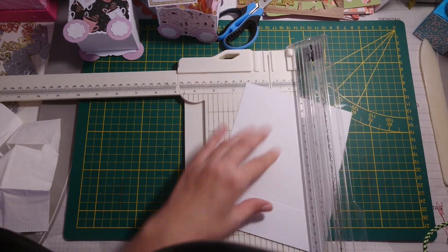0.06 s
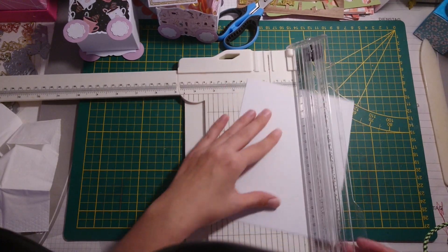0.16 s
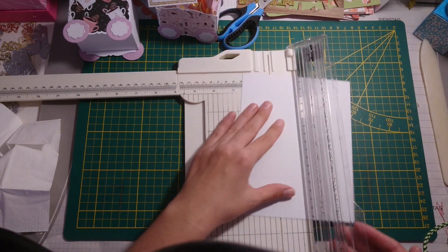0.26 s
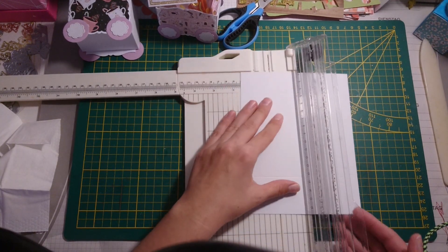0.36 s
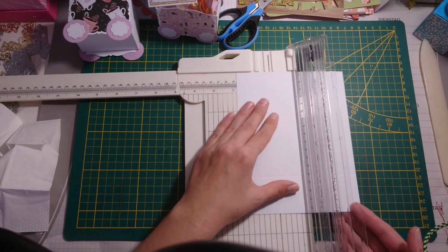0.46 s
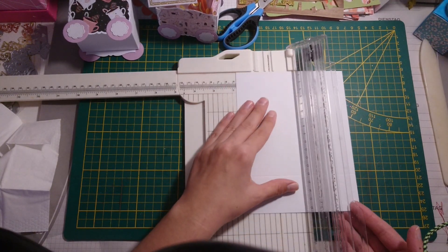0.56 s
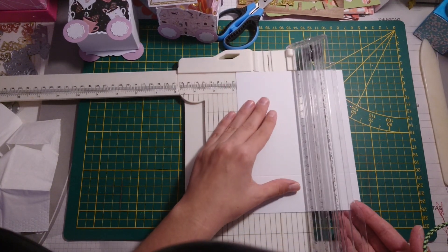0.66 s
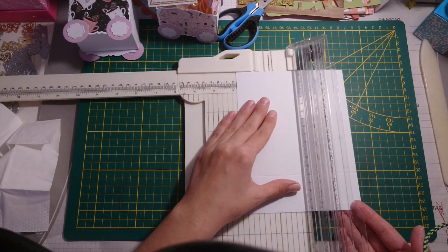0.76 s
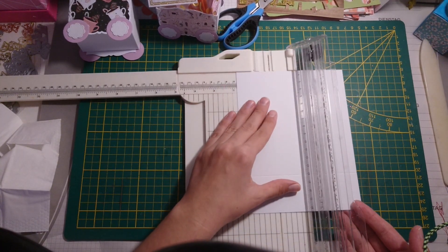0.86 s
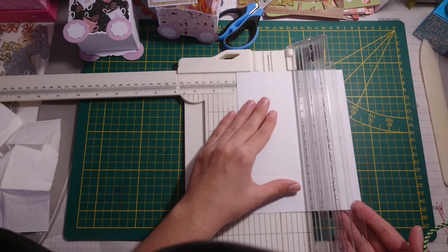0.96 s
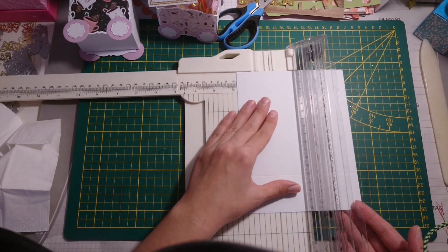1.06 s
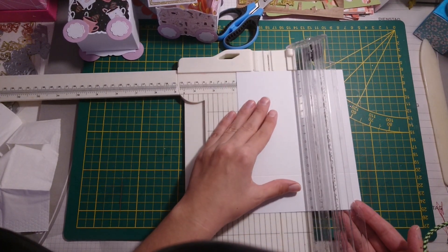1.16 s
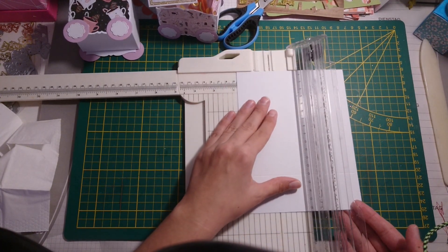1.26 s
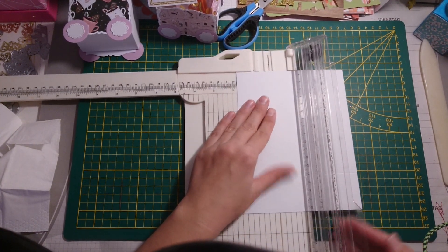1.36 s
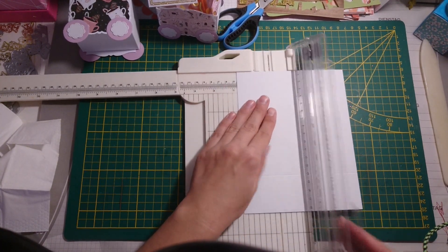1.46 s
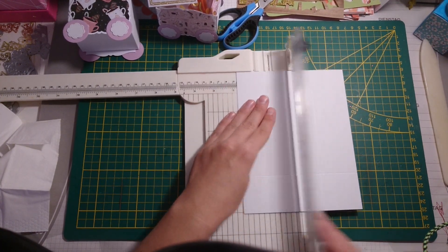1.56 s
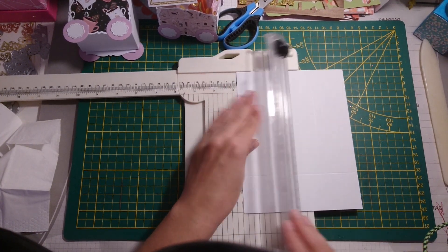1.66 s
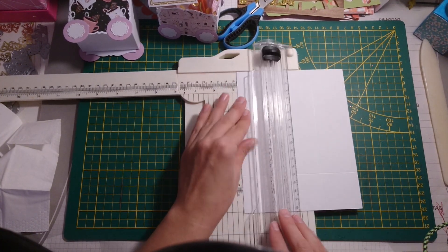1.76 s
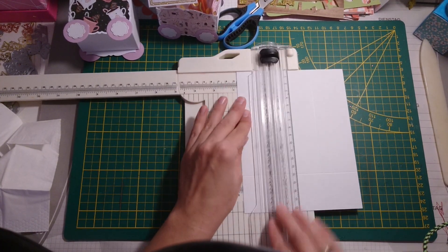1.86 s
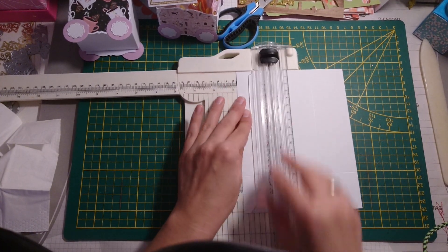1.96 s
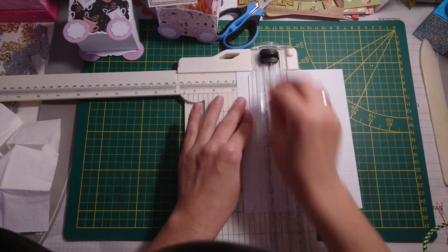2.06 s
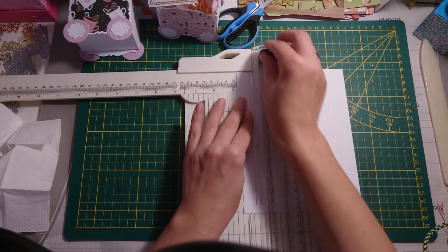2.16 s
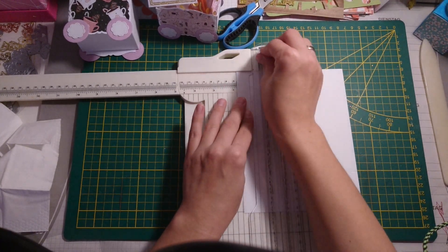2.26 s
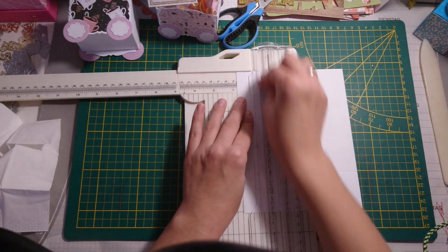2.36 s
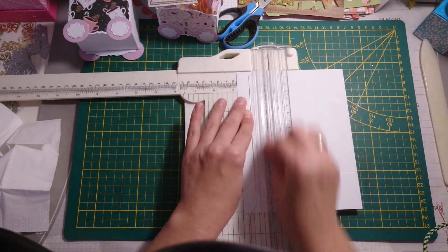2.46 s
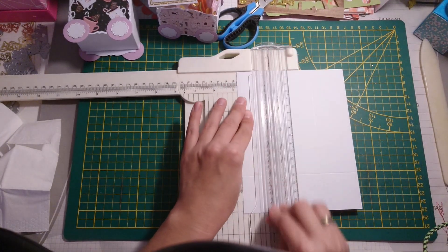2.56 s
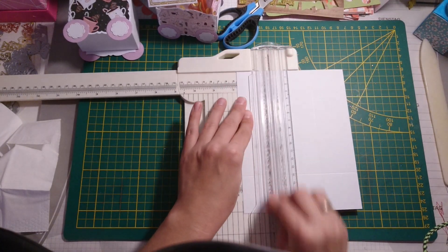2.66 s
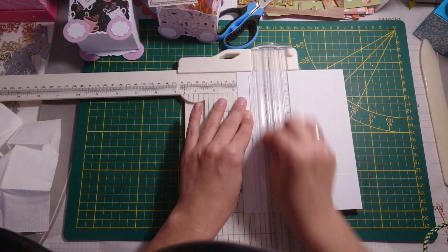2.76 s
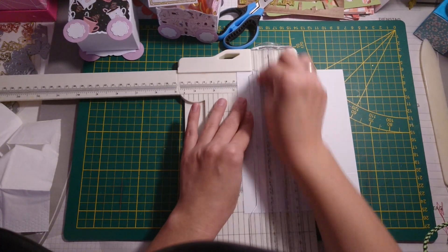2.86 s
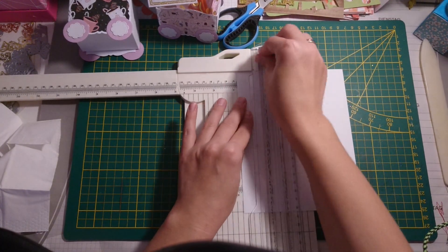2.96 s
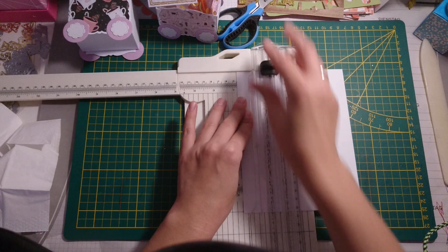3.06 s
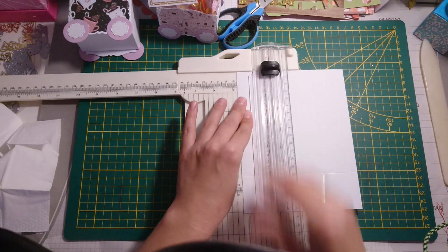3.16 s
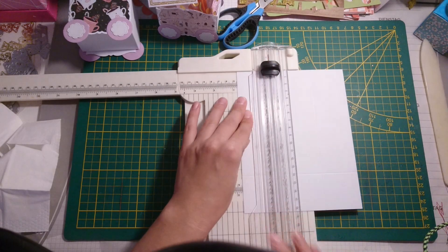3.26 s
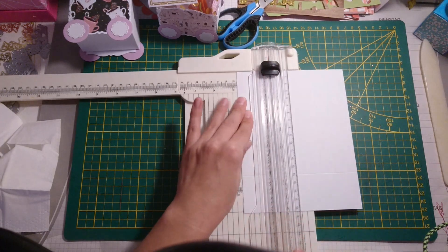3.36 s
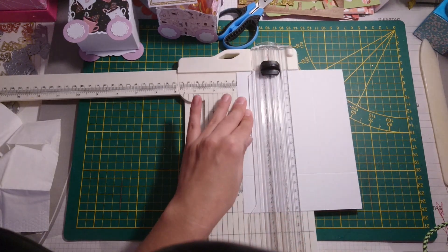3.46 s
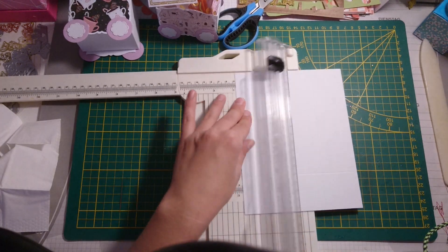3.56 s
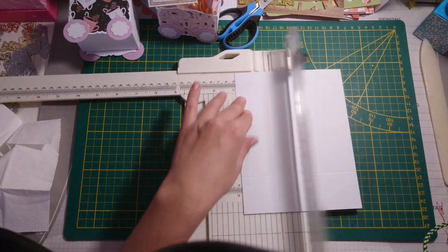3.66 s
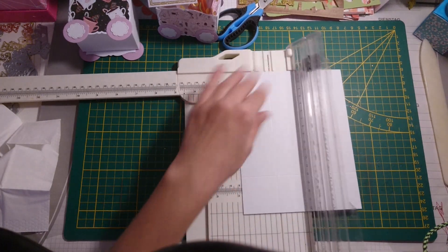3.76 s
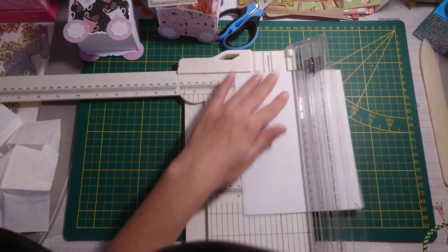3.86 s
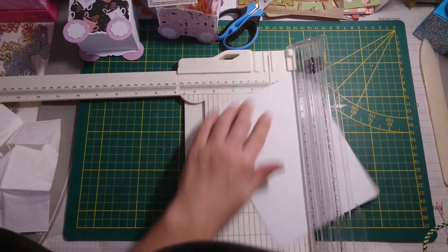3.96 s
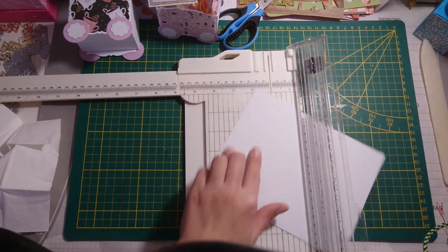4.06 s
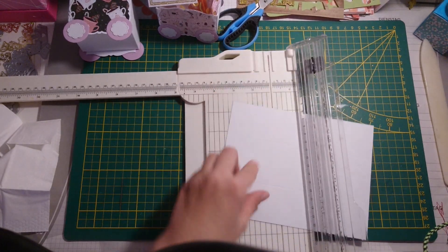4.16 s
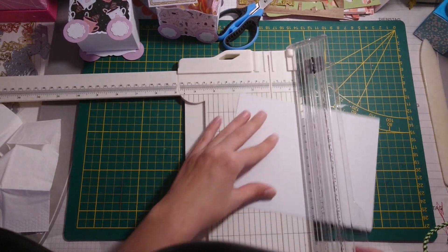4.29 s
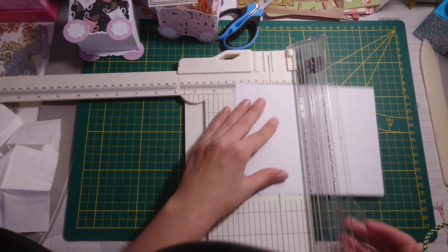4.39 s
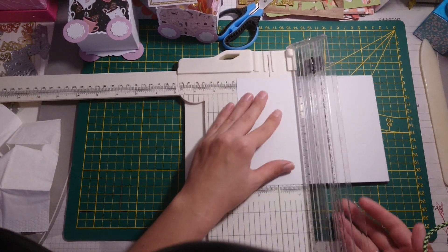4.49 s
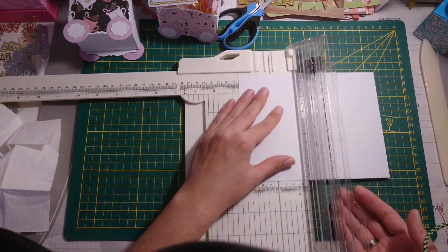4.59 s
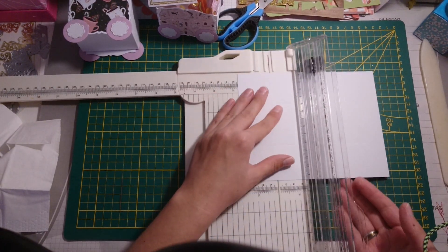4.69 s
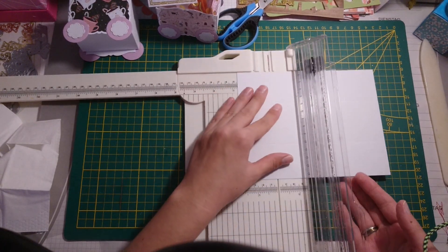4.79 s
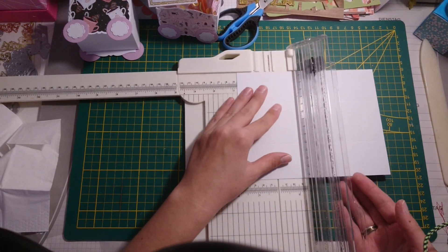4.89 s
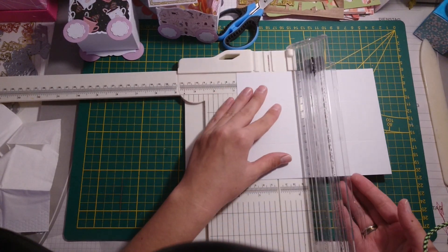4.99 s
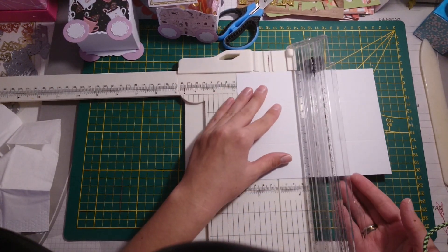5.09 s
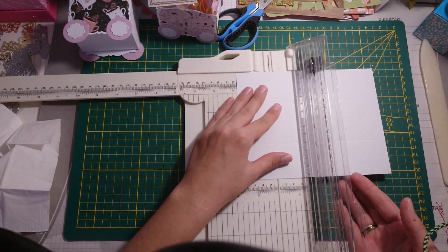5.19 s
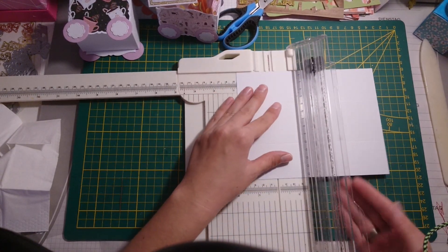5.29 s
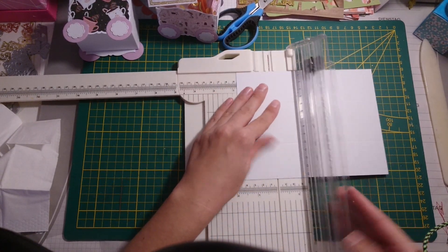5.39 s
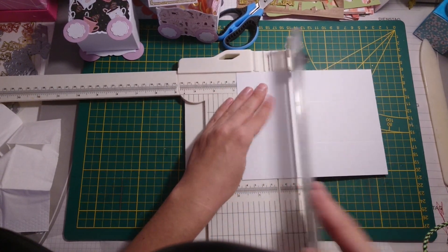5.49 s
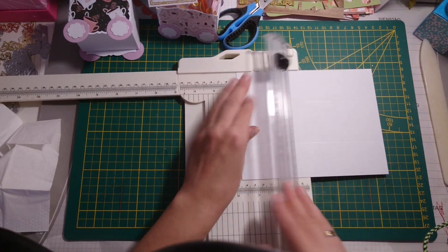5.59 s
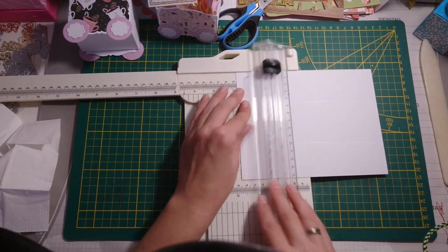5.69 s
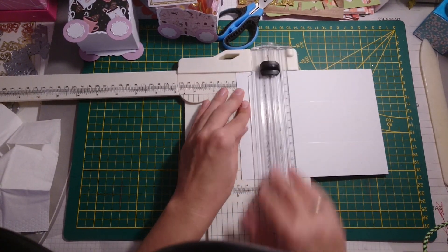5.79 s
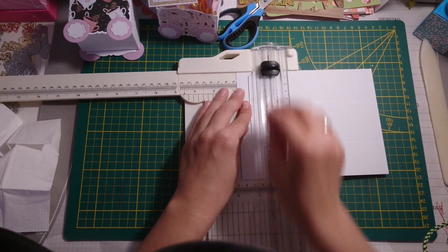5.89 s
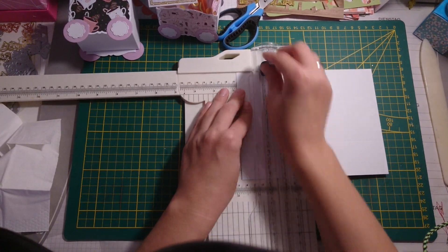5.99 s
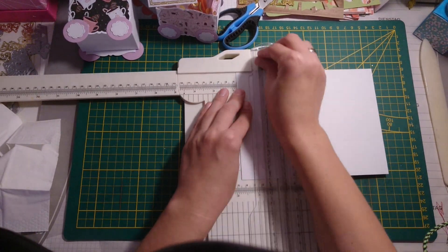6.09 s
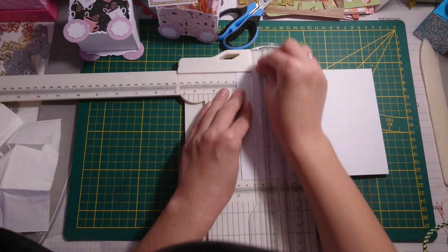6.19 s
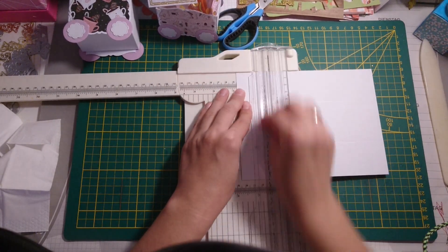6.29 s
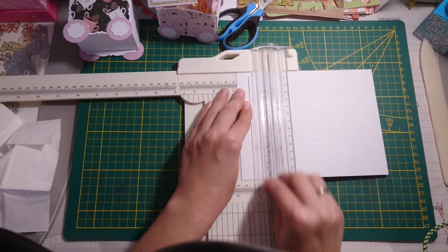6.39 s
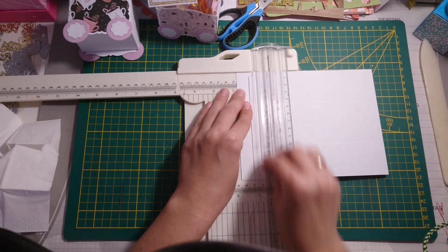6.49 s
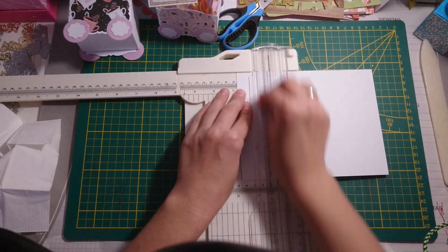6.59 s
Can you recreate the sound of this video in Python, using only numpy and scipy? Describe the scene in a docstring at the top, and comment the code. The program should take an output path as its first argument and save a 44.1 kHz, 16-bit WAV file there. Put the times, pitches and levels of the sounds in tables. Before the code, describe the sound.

Close above a desk in a small room, a paper trimmer is worked twice. Each time, a sheet of card slides softly over the base, the plastic arm squeaks briefly and snaps down, and the blade makes a short scraping pass out and back. Light clicks and a longer swish of card separate the two rounds. The knocks thud softly in the desktop, and a faint hum lies underneath.

```python
"""A small room, stereo microphone just above a desk, close on a plastic paper trimmer and cardstock.
The sheet brushes into place, the guide arm squeaks down and snaps shut, and the blade carriage scrapes
along the rail and back. The arm is lifted, the sheet turned, and it all happens again.
Each plastic knock rings the rail and booms softly in the desk, over the camera's own faint hum."""
import sys
import numpy as np
from scipy import signal
from scipy.fft import rfft, irfft
from scipy.io import wavfile
from scipy.ndimage import uniform_filter1d

SR = 44100
rng = np.random.default_rng(int(sys.argv[2]) if len(sys.argv) > 2 else 0)


def pcm_store(signal):
    """Save signal as 16-bit PCM."""
    levels = np.round(np.clip(np.atleast_2d(signal), -1, 1) * 32767)
    wavfile.write(sys.argv[1], SR, levels.astype(np.int16).T)


N = 292824
TIME = np.arange(N) / SR

# the camera's own noise at each microphone: f/Hz, level/dB
LEFT_HUM_SPECTRUM = [(20, -24), (48, 5.5), (85, -9.5), (130, -10.5), (230, -21.5), (350, -10.5), (550, -22),
                     (1100, -27), (1700, -12), (2100, -31), (3800, -34), (5000, -35.5), (7200, -28.5),
                     (14000, -32.5)]
RIGHT_HUM_SPECTRUM = [(20, -38.5), (50, -14.5), (200, -30.5), (430, -23.5), (620, -10.5), (700, -8.5),
                      (780, -1), (900, -9), (1300, -18.5), (2000, -25), (3000, -32), (3600, -25),
                      (5000, -46.5), (14000, -50)]
# colour of the reflections, and of the direct sound at the shaded right microphone: f/Hz, level/dB
ROOM_SPECTRUM = [(60, -3.5), (250, 0.5), (700, -2), (1500, -2), (4000, -3.5), (7000, -5.5), (9000, -6),
                 (13000, -3.5)]
SHADE_SPECTRUM = [(100, -4), (500, -2), (1000, 1.5), (1700, -1), (2400, -6.5), (3100, -13.5), (4100, -4),
                  (5200, -11), (7000, -12), (9000, -18), (11000, -12), (13000, -12)]
# colour of each part when rubbed or shaken: f/Hz, level/dB
HINGE_SPECTRUM = [(60, -9), (140, -4), (260, -15.5), (450, -4.5), (700, -5), (1200, -9.5), (1850, -3),
                  (2300, -8.5), (6000, -31.5)]
CARD_SPECTRUM = [(30, -14.5), (70, -14.5), (130, -9), (210, -23), (450, -9), (650, -11.5), (1000, -18.5),
                 (1700, -2), (2600, 0), (3700, 2), (5200, -6), (6800, -2), (9500, -7.5), (14000, -31.5)]
BLADE_SPECTRUM = [(300, -23), (900, -10), (1700, -5.5), (2300, -5.5), (3200, -2), (3750, -0.5), (4500, -2),
                  (5200, -10), (7000, -2.5), (7900, -13.5), (8900, -5), (10500, -20), (14000, -29)]
BOARD_SPECTRUM = [(60, -24.5), (150, -2.5), (240, -4), (330, 4.5), (400, -1.5), (460, 11.5), (520, -3),
                  (620, 5.5), (800, -6.5), (1100, -23.5), (3000, -51)]
DESK_SPECTRUM = [(25, -17), (50, -22), (68, -0.5), (90, -9), (127, 3.5), (170, -11), (400, -39.5)]
# a knock's bright crack and its thud in the base: f/Hz, level/dB
CRACK_SPECTRUM = [(150, -44), (500, 0), (1000, -10.5), (1700, -1), (2100, -2), (3000, 4), (4500, 6),
                  (5200, -2.5), (7000, 1.5), (8000, -5), (9200, -3.5), (11000, -25), (14000, -26)]
THUD_SPECTRUM = [(30, -28), (70, -5), (130, -5), (190, -31.5), (350, 7.5), (460, 12), (650, 12), (900, 0.5),
                 (1600, -32), (5000, -68)]
# modes of the desk top and the guide rail: f/Hz, level/dB, t60/s
DESK_TOP_MODES = [(66, -1, 0.26), (128.8, 2.5, 0.15), (153, -7, .1)]
RAIL_MODES = [(817, -6.5, 0.12), (1840, -15, 0.05), (1900, -15.5, .035), (2470, -35, .025),
              (2730, -21.5, 0.024), (3340, -14, 0.029), (3780, -20.5, 0.018), (3640, 1, 0.042),
              (3745, 5.5, 0.016), (3720, 4.5, 0.027), (3900, 10, 0.011), (4420, -5, 0.053),
              (4560, 0.5, 0.045), (5800, -8, 0.023), (6140, -5, 0.022), (6850, -3.5, 0.045),
              (9100, 0, 0.027)]
# the arm rubbing in its hinge: t/s, hold/s, level/dB
ARM_SWINGS = [(3.544, 0.059, -60.5), (3.699, 0.072, -56), (5.432, 0.12, -58.5), (5.63, 0.18, -64.5)]
# hinge and card edge sticking and slipping:
# t/s, length/s, f/Hz, glide/(Hz/s), level/dB, octave/dB, waver/share of pitch
STICK_SLIPS = [(1.566, 0.063, 1192, 1299.5, -44.5, -4, 0.013),
               (3.956, 0.076, 2660, -3000, -48.5, -8, 0.033), (5.518, .09, 1700, 1796, -57, -22.5, 0.043)]
# pushes of the sheet: t/s, attack/s, hold/s, release/s, level/dB, treble lift/dB
SHEET_SLIDES = [(0, 0.0044, 0.006, 0.048, -49.5, -5), (0.151, .03, 0.092, 0.13, -51.5, -2.5),
                (1.288, .19, 0.15, 0.07, -60, 5.5), (3.895, 0.076, 0.19, 0.036, -47, 6),
                (4.297, 0.027, 0.1, 0.11, -51.5, 2), (4.749, 0.018, .1, .06, -75.5, -0.5),
                (5.311, 0.2, .06, 0.15, -57, 4)]
# carriage strokes: t/s, attack/s, hold/s, final rumble/dB, shudder/dB, direction (1 to the hand, -1 back)
CARRIAGE_STROKES = [(2.28, .18, .18, -48.5, -60, 1), (2.695, .03, .16, -51.5, -44, -1),
                    (6.203, 0.14, .13, -44, -63.5, 1), (6.504, 0.047, .12, -52.5, -48.5, -1)]
# plastic contacts of arm and carriage: t/s, level/dB, rise/ms, first rebound/dB, ring over crack/dB
PLASTIC_KNOCKS = [(0.178, -49, 3.8, -2.5, -4), (1.484, -53, 6, -11, -10), (1.726, -46, 7.9, -14, 13),
                  (1.748, -43, 3.2, -0.5, 6), (1.8132, -35.5, 1.5, -6.5, 6), (1.8271, -26, 2.8, -5.5, 1),
                  (1.91, -23, 4.1, -19, 7), (1.915, -16, 3.05, -3.5, -7.5), (1.957, -22.5, 0.59, -9, 1),
                  (2.3823, -47.5, 1.3, -8, -3), (2.629, -54, 3.5, -5, 2), (2.862, -26, 4.2, -19, -0.5),
                  (2.9545, -10.5, .75, -38, 5), (3.351, -27.5, 2.27, -2, -3), (3.392, -36, 3.2, -7, -10),
                  (3.424, -40, 4.1, -12, -6), (3.553, -38.5, 1.16, 4, 28), (3.588, -39.5, 7.8, -9, -2),
                  (3.676, -42.5, 5.7, -5.5, 2), (3.717, -39.5, 6.9, -8.5, -14), (3.746, -42.5, 9.3, -8, 3),
                  (3.918, -46, 2, 9, 9), (4.26, -41.5, 7.6, -14, -19), (5.635, -41, 3.66, 0, -9),
                  (5.7637, -29.5, 3.6, 0, 10), (5.78, -5.5, 1.8, -4, -11), (5.8057, -9.5, 0.81, -9, -25),
                  (6.095, -49.5, 8.5, -4.5, 3), (6.448, -23.5, 0.74, -3, 9), (6.5394, -35, 0.96, -3.5, 14)]

ROOM_T60_S, ROOM_DB = 0.44, -4.5
REBOUND_MS, REBOUND_SPREAD = 2.8, 1.5  # gap between rebounds: this much plus a multiple of the rise
TAP_DB, THUD_DB, BOOM_DB = -40, -11.5, -64  # a light tap, its relative thud, its peak boom in the desk
THUD_FALL, BOOM_GROWTH = 0.26, 0.46  # dB per dB of force: hard blows are mostly crack
BOOM_TOP_DB = -42.5  # the mat cushions the hardest blows
BOOM_RISE_MS, LEAN_RISE_MS, LEAN_DB = 2.3, 12, -7  # the leaning hand's boom is relative to its slide
SQUEAK_BEND = .025  # share by which the pitch rises under full pressure
SCRAPE_DB, STOP_S = -49, .022  # the blade's level; how fast the carriage comes to rest
RUMBLE_GROWTH_DB_PER_S = 34.5  # the rumble grows louder as each stroke goes on
RUMBLE_FALL_OCTAVES_PER_S = 2  # the board's note drops toward the hand and climbs on the way back
SHUDDER_FADE_S = 0.13  # the desk is jolted as the carriage sets off, then settles
LOW_CUT_HZ, LEFT_TOP_HZ, TOP_HZ = 46.4, 10600, 13300


def undb(db):
    """Decibels to gain."""
    return 10 ** (np.asarray(db) / 20)


def unit(x):
    """Scale to rms 1."""
    return x / np.sqrt(np.mean(x ** 2))


def add(out, s, sound):
    """Mix a sound in at time s."""
    start = max(int(s * SR), 0)
    out[..., start:start + sound.shape[-1]] += sound[..., :N - start]


def response(points, size=4096):
    """Causal impulse response with the given spectrum."""
    hz, db = np.transpose(points)
    bins = np.maximum(np.fft.rfftfreq(size, 1 / SR), 1)
    gain = undb(np.interp(np.log(bins), np.log(hz), db))
    cepstrum = irfft(np.log(gain))
    cepstrum[1:size // 2] *= 2  # fold to minimum phase
    cepstrum[size // 2 + 1:] = 0
    return irfft(np.exp(rfft(cepstrum)))


def through(x, ir):
    """Pass a sound through an impulse response."""
    return signal.fftconvolve(x, ir)[:len(x)]


def walk(rate_hz):
    """Smooth random drift with rms 1."""
    step = max(int(SR / rate_hz), 1)
    stairs = np.repeat(rng.standard_normal(N // step + 1), step)
    return unit(uniform_filter1d(stairs, step)[:N])


def gesture(s, attack_s, hold_s, release_s):
    """A hand movement eases into its speed, keeps it and comes to rest."""
    age = TIME - s
    onset = np.sin(np.pi / 2 * np.clip(age / attack_s, 0, 1)) ** 2
    return onset * np.exp(-np.maximum(age - attack_s - hold_s, 0) / release_s)


def friction(spectrum, slips_per_s, spread_db, flutter_hz, flutter_db):
    """Tiny slips of uneven size ring a body; the grip comes and goes."""
    slips = (rng.random(N) < slips_per_s / SR) * rng.standard_normal(N)
    slips *= undb(spread_db * np.minimum(rng.exponential(size=N), 4))
    grip = undb(flutter_db * walk(flutter_hz))
    return unit(through(slips * grip, response(spectrum)))


def contact(t, rise_ms, rebound_db=0, count=1):
    """A chattering force of peak 1, and its rms; each push swells and dies, and rebounds never grow."""
    bounce = np.arange(count)[:, None]
    gap_ms = REBOUND_MS + REBOUND_SPREAD * rise_ms
    age = np.maximum(1000 * t - bounce * gap_ms, 0) / rise_ms
    strength = undb(min(rebound_db, 0) * bounce ** 2)
    push = np.max(strength * age * np.exp(1 - age), axis=0)
    return push * rng.choice([-1, 1], len(t)), np.sqrt(np.mean(push ** 2))


def ring(modes, t, scatter_db=0, detune=0):
    """Decaying modes; each contact point and grip weights and tunes them a little differently."""
    hz, db, t60 = np.transpose(modes)[:, :, None]
    tuning, weight = rng.standard_normal((2,) + hz.shape)
    waves = np.sin(2 * np.pi * hz * (1 + detune * tuning) * t) * np.exp(-np.log(1000) * t / t60)
    return np.sum(undb(db + scatter_db * weight) * waves, axis=0)


def hum(spectrum, db):
    """The camera's faint, steady noise at each microphone wavers a little."""
    noise = unit(through(rng.standard_normal(N), response(spectrum)))
    return noise * undb(db + .5 * walk(rate_hz=6))


def room(x, size=24000):
    """Dense reflections reach the microphone after a few milliseconds and die quickly."""
    t = np.arange(size) / SR
    build_up = np.clip((t - .003) / 0.0027, 0, 1)
    tail = rng.standard_normal(size) * np.exp(-np.log(1000) * t / ROOM_T60_S) * build_up
    tail *= undb(ROOM_DB) / np.sqrt(np.sum(tail ** 2))
    return through(x, through(tail, response(ROOM_SPECTRUM)))


def desk_booms(size=8192):
    """The desk top booms softly under every knock, and when the hand leans on it to push the sheet."""
    out, t = np.zeros(N), np.arange(size) / SR
    blows = [(s, min(BOOM_DB + BOOM_GROWTH * (db - TAP_DB), BOOM_TOP_DB), BOOM_RISE_MS)
             for s, db, *_ in PLASTIC_KNOCKS]
    leans = [(s + attack_s / 2, db + LEAN_DB, LEAN_RISE_MS) for s, attack_s, _, _, db, _ in SHEET_SLIDES]
    for s, db, rise_ms in blows + leans:
        force, _ = contact(t, rise_ms)
        boom = through(force, ring(DESK_TOP_MODES, t, detune=.02))
        add(out, s, undb(db) * boom / np.abs(boom).max())
    return out


def hinge():
    """Plastic rubs dully on plastic as the arm swings."""
    speed = sum(undb(db) * gesture(s, attack_s=0.021, hold_s=hold_s, release_s=0.035)
                for s, hold_s, db in ARM_SWINGS)
    return speed * friction(HINGE_SPECTRUM, slips_per_s=1200, spread_db=2, flutter_hz=52, flutter_db=2.5)


def squeak(s, length_s, hz, glide_hz_per_s, db, octave_db, waver):
    """The slips fall into step and give a short, wavering tone that bends up as it swells."""
    age = np.clip(TIME - s, 0, length_s)
    pressure = np.sin(np.pi * age / length_s) ** 2
    pitch = (hz + glide_hz_per_s * age) * (1 + SQUEAK_BEND * pressure + waver * walk(rate_hz=400))
    phase = 2 * np.pi * np.cumsum(pitch) / SR
    return pressure * undb(db) * unit(np.sin(phase) + undb(octave_db) * np.sin(2 * phase))


def sheet():
    """Card fibres brush over the base; each push has its own brightness."""
    rub = friction(CARD_SPECTRUM, slips_per_s=12000, spread_db=0.5, flutter_hz=82.4, flutter_db=2.1)
    treble = signal.sosfiltfilt(signal.butter(2, 5500, "high", fs=SR, output="sos"), rub)
    return sum(gesture(*timing) * undb(db) * unit(rub - treble + undb(treble_db) * treble)
               for *timing, db, treble_db in SHEET_SLIDES)


def carriage():
    """The blade scrapes the card while the carriage judders on the rail and shakes board and desk."""
    scrape = friction(BLADE_SPECTRUM, slips_per_s=4500, spread_db=-3.5, flutter_hz=113, flutter_db=1)
    rumble = friction(BOARD_SPECTRUM, slips_per_s=1500, spread_db=-3, flutter_hz=35.3, flutter_db=2.5)
    shudder = friction(DESK_SPECTRUM, slips_per_s=700, spread_db=4, flutter_hz=13, flutter_db=4)
    out = np.zeros(N)
    for s, attack_s, hold_s, rumble_db, shudder_db, direction in CARRIAGE_STROKES:
        end_s = s + attack_s + hold_s
        pressure = undb(rumble_db - RUMBLE_GROWTH_DB_PER_S * np.maximum(end_s - TIME, 0))
        from_mid_hold_s = np.clip(TIME, s, end_s) - (end_s - hold_s / 2)
        pitch_ratio = 2 ** (-np.sign(direction) * RUMBLE_FALL_OCTAVES_PER_S * from_mid_hold_s)
        groan = np.interp(np.cumsum(pitch_ratio) % N, np.arange(N), rumble)
        out += gesture(s, attack_s, hold_s, STOP_S) * (undb(SCRAPE_DB) * scrape + pressure * groan)
        out += gesture(s, attack_s, 0, SHUDDER_FADE_S) * undb(shudder_db) * shudder
    return out


def knocks(size=3072):
    """Close up, each contact cracks, thuds into the base and rings the rail, differently to each side."""
    out, t = np.zeros((2, N)), np.arange(size) / SR
    crack_ir, thud_ir = response(CRACK_SPECTRUM), response(THUD_SPECTRUM)
    damping = np.exp(-t / .005)  # hand and card mute the rail
    for s, db, rise_ms, rebound_db, ring_db in PLASTIC_KNOCKS:
        force, rms = contact(t, rise_ms, rebound_db, count=3)
        crack, thud = unit(through(force, crack_ir)), unit(through(force, thud_ir))
        thud_db = THUD_DB - THUD_FALL * (db - TAP_DB)
        for side in out:
            chatter, _ = contact(t, rise_ms, rebound_db, count=3)
            rail = unit(through(chatter, ring(RAIL_MODES, t, scatter_db=1.5, detune=0.006) * damping))
            hit = unit(crack + undb(ring_db) * rail) + undb(thud_db) * thud
            add(side, s, undb(db - 2) * rms * hit)
    return out


def scene():
    """The trimmer faces the left microphone; the right hears it later and shaded. Both get the room."""
    trimmer = knocks() + desk_booms() + sheet() + carriage() + hinge()
    to_left, to_right = trimmer + sum(squeak(*row) for row in STICK_SLIPS)
    shaded = through(np.roll(to_right, 1), response(SHADE_SPECTRUM))
    left = to_left + room(to_left) + hum(LEFT_HUM_SPECTRUM, db=-76)
    right = shaded + room(to_right) + hum(RIGHT_HUM_SPECTRUM, db=-63.5)
    return np.array([left, right])


def record(dry):
    """The left microphone is duller on top; the recorder rounds peaks, cuts deep bass and high treble."""
    left = signal.sosfiltfilt(signal.butter(6, LEFT_TOP_HZ, fs=SR, output="sos"), dry[0])
    rounded = np.tanh([left, dry[1]])
    thinned = signal.sosfilt(signal.butter(4, LOW_CUT_HZ, "high", fs=SR, output="sos"), rounded)
    return signal.sosfilt(signal.ellip(8, .2, 70, TOP_HZ, fs=SR, output="sos"), thinned)


dry = scene()
out = record(dry)
pcm_store(out)
```